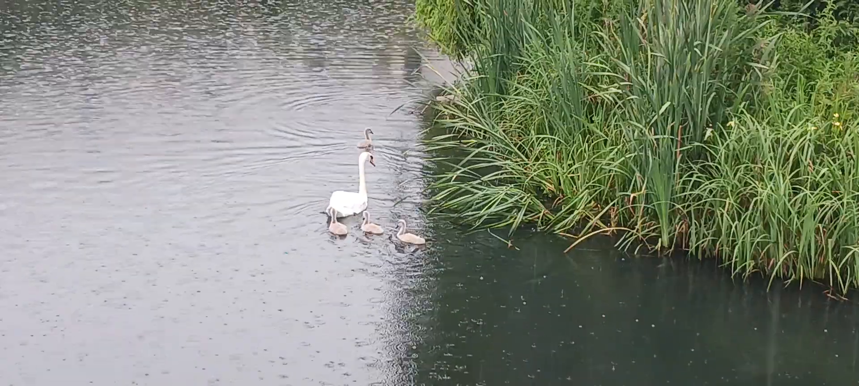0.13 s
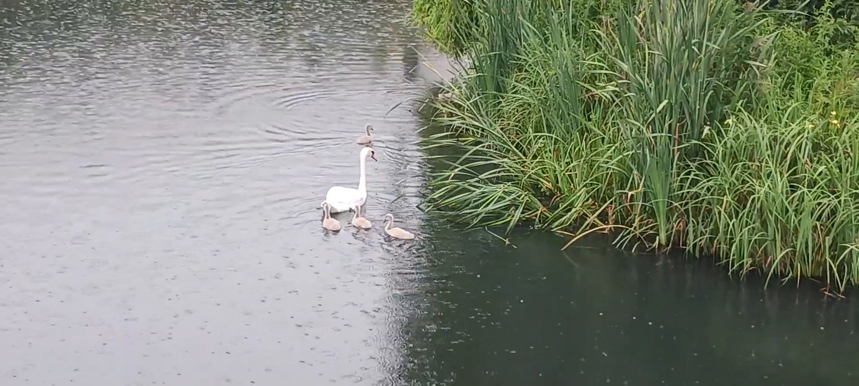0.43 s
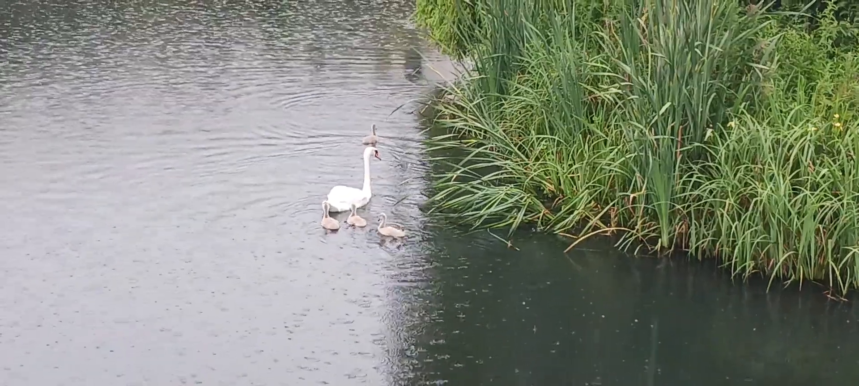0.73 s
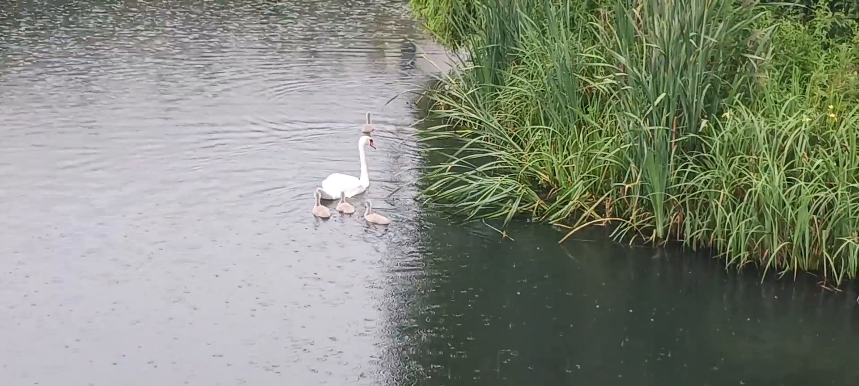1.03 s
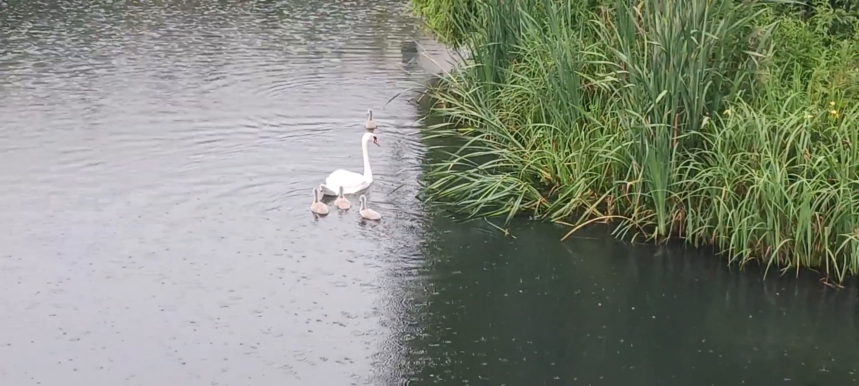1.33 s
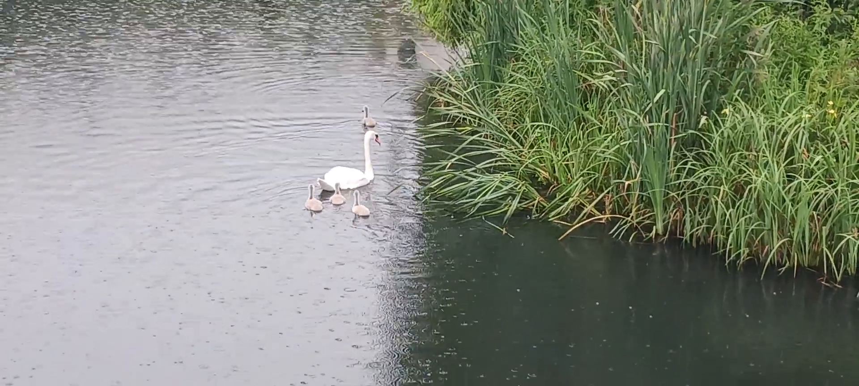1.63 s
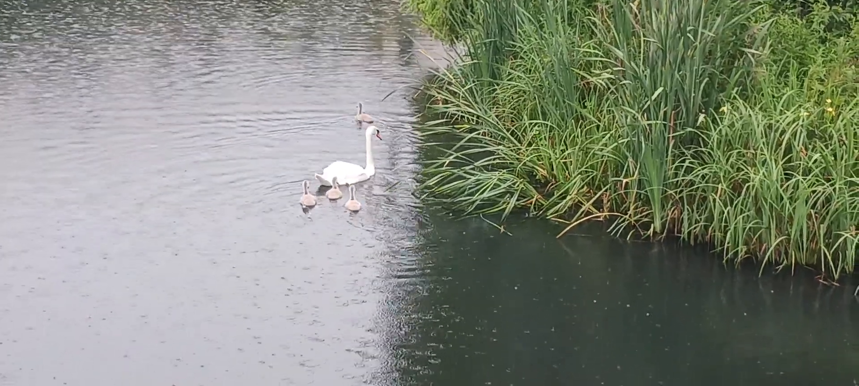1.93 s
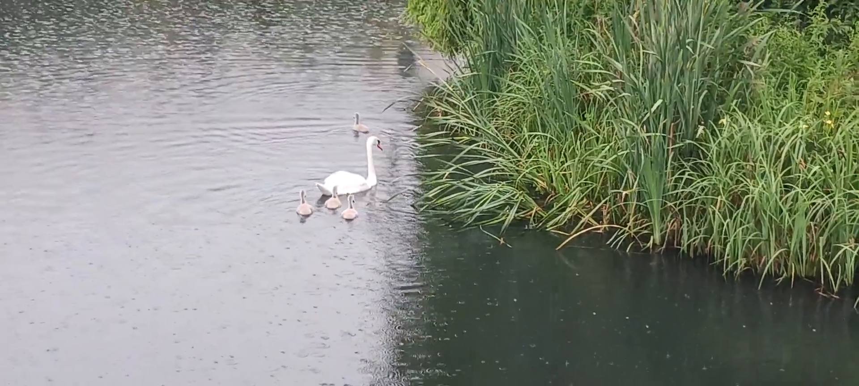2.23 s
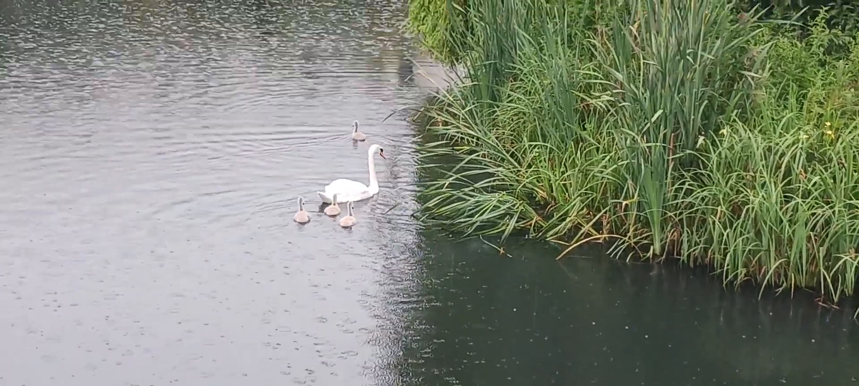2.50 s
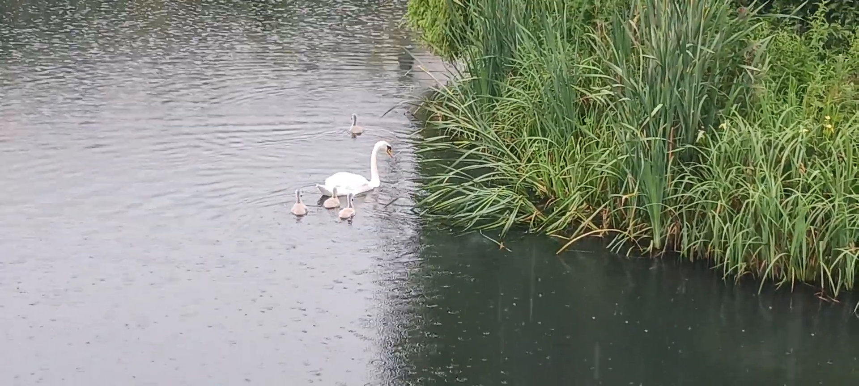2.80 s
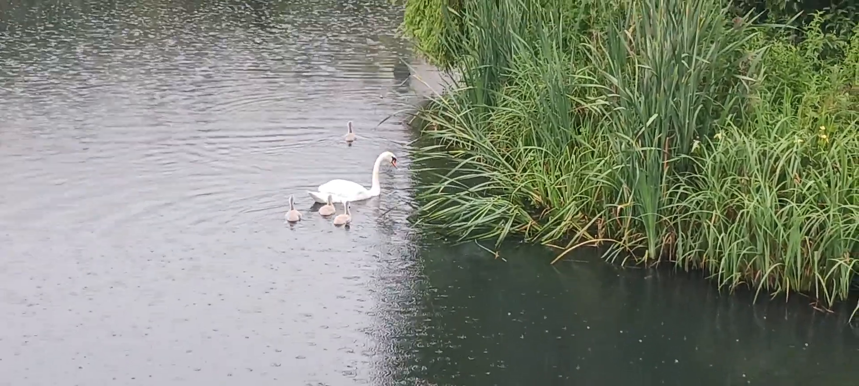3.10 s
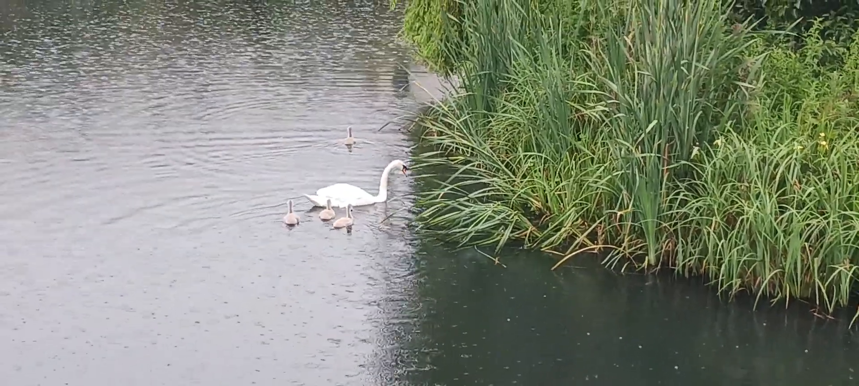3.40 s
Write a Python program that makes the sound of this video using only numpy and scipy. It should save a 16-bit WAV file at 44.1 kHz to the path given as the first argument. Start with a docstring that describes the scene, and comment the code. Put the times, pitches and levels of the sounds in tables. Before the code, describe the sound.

Rain patters steadily on open water, heard from the bank with the right side muffled. Faint close drips tick over a low outdoor rumble, followed by light bumps and scuffs of a hand on the microphone.

```python
"""Steady rain on a pond and its reeds fades in, heard from the bank on a hand-held camera.
Countless small drops merge into a hiss, dull in the muffled right microphone; air rumbles low
beside a faint hum. Soon a few near drips stand out, and one thin peep comes from the left.
Then the hand rubs and taps the camera's case; near the end a fingertip slides and the case ticks."""
import sys
import numpy as np
from scipy import signal
from scipy.fft import rfft, irfft
from scipy.io import wavfile
from scipy.ndimage import uniform_filter1d

SR = 44100
rng = np.random.default_rng(int(sys.argv[2]) if len(sys.argv) > 2 else 0)


def inscribe(sig):
    """Save sig as 16-bit PCM at rate SR to the path in sys.argv[1].

    A 1-D sig is mono; a 2-D sig holds one channel per row.
    Samples are clipped to [-1, 1] before scaling.
    """
    pcm = np.round(np.clip(np.atleast_2d(sig).T, -1, 1) * 32767)
    wavfile.write(sys.argv[1], SR, pcm.astype(np.int16))


N = 156555
TIME, FREQ = np.arange(N) / SR, np.fft.rfftfreq(N, 1 / SR)


def amp(db):
    """Turns decibels into a number to multiply by."""
    return 10 ** (np.asarray(db) / 20)


def unit(x):
    """Scales a signal to an average strength (rms) of 1."""
    return x / np.sqrt(np.mean(x ** 2) + 1e-20)


def over_hz(table):
    """Joins a table's rows into curves from low pitch to high."""
    hz, *columns = np.transpose(table)
    return np.array([np.interp(np.log(FREQ + 1), np.log(hz + 1), c) for c in columns])


def over_time(table):
    """Joins a table's rows into curves from start to end."""
    time_s, *columns = np.transpose(table)
    return np.array([np.interp(TIME, time_s, c) for c in columns])


def colour(x, db):
    """Shapes an even hiss of strength 1 to the given dB per Hz at each pitch."""
    return irfft(rfft(x) * amp(db) * np.sqrt(SR / 2), N)


def pair(x, likeness, lead_rad):
    """Blends two unrelated signals into a partly alike left and right."""
    left, other = rfft(x)
    right = (likeness * left + np.sqrt(1 - likeness ** 2) * other) * np.exp(-1j * lead_rad)
    return irfft(np.array([left, right]), N)


def band(samples, hz, octaves):
    """Makes a stretch of noise gathered around one pitch."""
    away = np.log2((FREQ + 1) / hz) / octaves
    return unit(irfft(rfft(rng.standard_normal(N)) * np.exp(-away ** 2 / 2), N))[:samples]


def add(mix, start_s, sound, pan_db=0):
    """Places a sound in the mix, pan_db louder on the left than on the right."""
    part = mix[:, round(start_s * SR):][:, :len(sound)]
    part += amp([[pan_db / 2], [-pan_db / 2]]) * sound[:part.shape[1]]


def wash(patch_db=1.05, flicker_db=0.38, swell_db=-0.3):
    """Distant drops merge into a hiss with drifting patches, quick flicker and a slow swell."""
    hiss = signal.stft(rng.standard_normal((2, N)), nperseg=256)[2]  # side, pitch, time
    patches = uniform_filter1d(rng.standard_normal(hiss.shape[1:]), size=5, axis=0)
    patches = unit(uniform_filter1d(patches, size=14, axis=1))
    flicker = unit(uniform_filter1d(rng.standard_normal(hiss.shape[2]), size=3))
    swell = unit(uniform_filter1d(rng.standard_normal(hiss.shape[2]), size=36))
    db = patch_db * patches + flicker_db * flicker + swell_db * swell
    return unit(signal.istft(hiss * amp(db), nperseg=256)[1][:, :N])


def patter(pitches=28, drops_per_s=2600, spread_db=2.9, decay_cycles=3, tiny_drop_hz=4360):
    """Nearer drops of uneven size tick on water or leaves; the tiny high ones are more even."""
    t, out = np.arange(512) / SR, np.zeros((2, N))
    for hz in np.geomspace(700, 14000, pitches):
        uneven_db = spread_db * min(1, tiny_drop_hz / hz)
        size = amp(uneven_db * np.minimum(rng.exponential(1, (2, N)), 5))
        hits = size * (rng.random((2, N)) < drops_per_s / pitches / SR)
        tick = np.exp(-t * hz / decay_cycles) * np.sin(2 * np.pi * hz * t)
        out += hz * signal.oaconvolve(hits, tick[None], axes=1)[:, :N]
    return unit(out)


# The rain's tone in each microphone: pitch_hz, level_db_per_hz
RAIN_TONE_LEFT = [(200, -87.5), (450, -85), (700, -89), (900, -88), (1280, -75), (1600, -76), (2000, -81),
                  (2300, -85.5), (2900, -80), (3850, -75.5), (4350, -84.5), (5100, -91.5), (5900, -84.5),
                  (7000, -89.5), (8400, -93.5), (10100, -98.5), (12200, -90), (14400, -99), (15700, -96)]
RAIN_TONE_RIGHT = [(450, -92.5), (800, -98.5), (1050, -91.4), (1350, -87.5), (1800, -89), (2150, -95.5),
                   (2550, -94), (2800, -100), (3200, -94.6), (4100, -105), (5000, -119), (7400, -131),
                   (8500, -122.5), (14000, -120), (15400, -111.5)]
# How alike the two sides are: pitch_hz, likeness_0_to_1
RAIN_LIKENESS = [(250, 0.86), (480, 0.98), (800, 0.23), (1150, 0.63), (1650, 0.64), (2000, 0.25),
                 (2500, 0.57), (3600, .2)]
# How far the left wave runs ahead of the right: pitch_hz, lead_radians
RAIN_LEAD = [(300, .6), (680, 1.2), (950, .6), (1250, 1.1), (1600, -.3), (2000, .15), (3000, 2.6)]
# How the rain grows and eases: time_s, left_gain_db, right_gain_db
RAIN_GAIN = [(.15, 1.5, -0.5), (.5, -0.25, -4), (1.4, 1.5, .5), (2.2, 1.5, 1.5), (3.55, 1.2, -0.5)]


def rain(wash_db=-1.56, patter_db=-8):
    """Far and nearer drops reach an open left microphone and a muffled right one."""
    drops = amp(wash_db) * wash() + amp(patter_db) * patter()
    drops = pair(drops, over_hz(RAIN_LIKENESS)[0], over_hz(RAIN_LEAD)[0])
    tone_db = np.vstack([over_hz(RAIN_TONE_LEFT), over_hz(RAIN_TONE_RIGHT)])
    return colour(drops, tone_db) * amp(over_time(RAIN_GAIN))


# The deep tone of the air: pitch_hz, level_db_per_hz
AIR_TONE = [(18, -110), (32, -79), (50, -66.5), (70, -69.5), (92, -75.5), (140, -77.5), (250, -81.5),
            (400, -92.5), (1500, -135)]
# How the rumble rises and falls: time_s, gain_db
AIR_GAIN = [(.15, -5), (.6, -3), (.93, -6), (1.02, 0.5), (1.54, -2.5), (1.68, 2.5), (1.82, -2), (2.3, -0.5),
            (2.56, 1), (2.7, -2.5), (3.55, -0.5)]


def air_rumble():
    """Air makes a low, lumpy noise, much the same on both sides."""
    air = pair(rng.standard_normal((2, N)), likeness=.85, lead_rad=.45)
    return colour(air, over_hz(AIR_TONE)) * amp(over_time(AIR_GAIN))


def hum(pitch_hz=565, width_hz=7, level_db=-68.8):
    """A faint, far-off tone wavers, made from a very narrow slice of noise."""
    narrow = rfft(rng.standard_normal(N)) / (1 + ((FREQ - pitch_hz) / width_hz) ** 2)
    return amp(level_db) * unit(irfft(narrow, N))


# Near drips and, in the last two rows, light ticks of the hand on the case:
# start_s, pitch_hz, ring_s (time to fade by 60 dB), left_level_db
DRIPS_AND_TICKS = [(.3963, 4900, .005, -37), (.493, 12600, .004, -33), (.574, 4200, .007, -32),
                   (.822, 3600, 0.009, -28), (0.9745, 7800, .013, -30), (1.0112, 6200, .005, -34),
                   (1.2878, 3700, .006, -29), (1.5744, 8000, .005, -37), (2.4175, 3600, .007, -31),
                   (3.3265, 2115, .075, -29.5), (3.3264, 1490, .013, -26)]


def drips_and_ticks(burst_gain=.5, burst_s=.0014, rise_s=.0004):
    """Each small hit makes a burst of noise and a short ring, muffled on the right like the rain."""
    t, out = np.arange(4096) / SR, np.zeros((2, N))
    onset = 1 - np.exp(-t / rise_s)
    for start_s, pitch_hz, ring_s, level_db in DRIPS_AND_TICKS:
        burst = burst_gain * band(len(t), pitch_hz, octaves=0.55) * np.exp(-t / burst_s)
        ring = amp(-60 * t / ring_s) * np.sin(2 * np.pi * pitch_hz * t)
        add(out, start_s, amp(level_db) * onset * (burst + ring))
    muffle = amp(over_hz(RAIN_TONE_RIGHT) - over_hz(RAIN_TONE_LEFT))
    return np.vstack([out[0], irfft(rfft(out[1]) * muffle, N)])


def peep(length_s=.05, pitch_hz=5980, level_db=-63):
    """A thin whistle, perhaps a young bird, swells and fades."""
    t = np.arange(0, length_s, 1 / SR)
    return amp(level_db) * np.sin(np.pi * t / length_s) * np.sin(2 * np.pi * pitch_hz * t)


# Fingers rubbing the case: start_s, length_s, level_db, pitch_hz, width_octaves, pan_db
FINGER_RUBS = [(1.249, 0.079, -58.5, 360, 0.68, -6), (1.908, 0.125, -53.5, 370, 0.73, -7),
               (2.1, 0.04, -54, 2200, 0.42, 1), (1.923, 0.032, -47.5, 4190, 0.19, 17),
               (1.922, 0.032, -56, 6100, 0.098, 22), (2.572, 0.097, -50, 260, 1.0, -3.5),
               (2.565, 0.16, -52, 1370, 0.37, 3), (2.872, 0.06, -52.5, 1940, 0.5, 8),
               (3.169, 0.087, -55.5, 920, 0.94, 0), (3.326, 0.24, -57.5, 490, 1, -5),
               (3.345, 0.24, -51.5, 2020, 0.31, 3.5)]


def finger_rubs(rough_db=1):
    """Skin catches and slips on the case: grainy scuffs that swell quickly and die away."""
    out = np.zeros((2, N))
    for start_s, length_s, level_db, pitch_hz, octaves, pan_db in FINGER_RUBS:
        t = np.arange(0, length_s, 1 / SR)
        grain = unit(uniform_filter1d(rng.standard_normal(N), size=130))[:len(t)]
        scuff = unit(band(len(t), pitch_hz, octaves) * amp(rough_db * grain))
        swell = np.sin(np.pi * (t / length_s) ** 0.44)
        add(out, start_s, amp(level_db) * swell * scuff, pan_db)
    return out


# The hand tapping the case: start_s, pitch_hz, rise_s, level_db, pan_db
HAND_TAPS = [(1.41, 55.5, 0.0086, -44, 9), (1.9155, 190, 0.0022, -42, -2), (1.935, 470, 0.0029, -33.5, -3),
             (2.338, 173, 0.0029, -41.5, 0), (2.487, 49, 0.012, -40, 0), (2.578, 109, 0.003, -33.5, -4),
             (3.2442, 800, 0.00083, -37.5, -3), (3.3266, 470, 0.002, -37.5, 2)]


def hand_taps():
    """Each soft push of the hand swings the case back and forth a few times."""
    t, out = np.arange(8192) / SR, np.zeros((2, N))
    for start_s, pitch_hz, rise_s, level_db, pan_db in HAND_TAPS:
        swell = (t / rise_s) ** 2 * np.exp(2 * (1 - t / rise_s))
        add(out, start_s, amp(level_db) * swell * np.sin(2 * np.pi * pitch_hz * t), pan_db)
    return out


# The tone of the sliding fingertip: pitch_hz, left_db_per_hz, right_db_per_hz
SLIDE_TONE = [(6000, -108, -140), (8600, -83, -120), (9200, -88.5, -102), (10150, -90, -102),
              (10550, -78.5, -101), (11050, -86, -102), (11700, -78.5, -100), (12700, -83.5, -104),
              (13800, -91, -99), (14900, -84.5, -86)]
# How the slide swells and fades: time_s, gain_db
SLIDE_GAIN = [(2.87, -26), (2.95, -6.5), (3.03, -2), (3.075, -1), (3.125, -9), (3.163, 2.5), (3.205, -27)]


def finger_slide(rough_db=0.8):
    """A fingertip slides over the case by the microphones with a thin, high hiss."""
    grain = unit(uniform_filter1d(rng.standard_normal(N), size=200))
    hiss = colour(rng.standard_normal((2, N)), over_hz(SLIDE_TONE))
    return hiss * amp(over_time(SLIDE_GAIN) + rough_db * grain)


def scene():
    """Rain, air and hum, joined by drips, a peep and the small sounds of the hand."""
    mix = rain() + air_rumble()
    add(mix, 0, hum(), pan_db=4)
    mix += drips_and_ticks()
    add(mix, .945, peep(), pan_db=30)
    return mix + finger_rubs() + hand_taps() + finger_slide()


def record(dry, low_cut_hz=27, fade_start_s=0.11, fade_s=0.088, high_cut_hz=15780):
    """The camera cuts the deepest bass, fades the sound in and cuts the highest treble."""
    sound = signal.sosfilt(signal.butter(4, low_cut_hz, "highpass", fs=SR, output="sos"), dry)
    fade = 1 - np.exp(-np.maximum(TIME - fade_start_s, 0) / fade_s)
    low_pass = signal.firwin(801, high_cut_hz, window=("kaiser", 9), fs=SR)
    return signal.oaconvolve(sound * fade, low_pass[None], "same")


dry = scene()
out = record(dry)
inscribe(out)
```